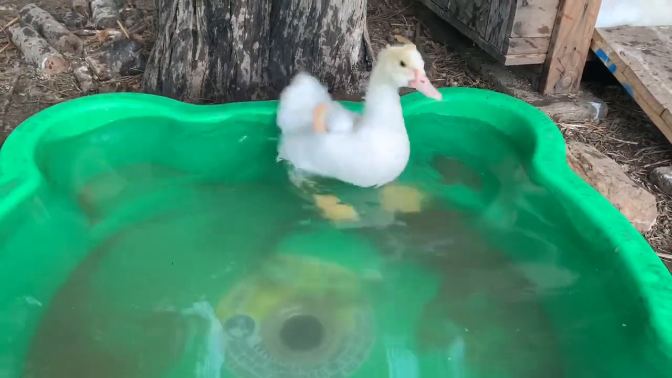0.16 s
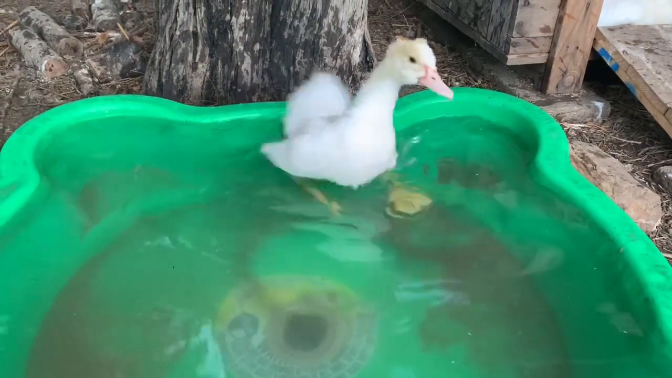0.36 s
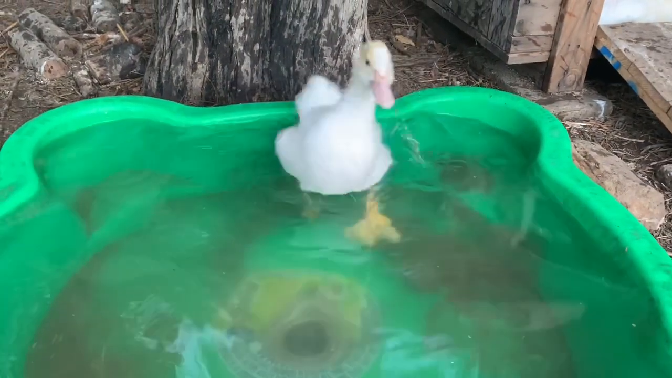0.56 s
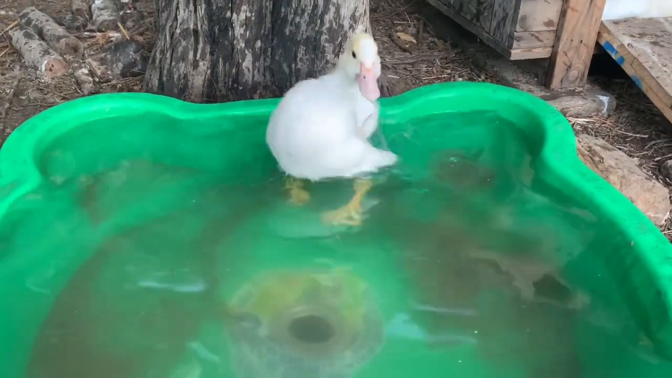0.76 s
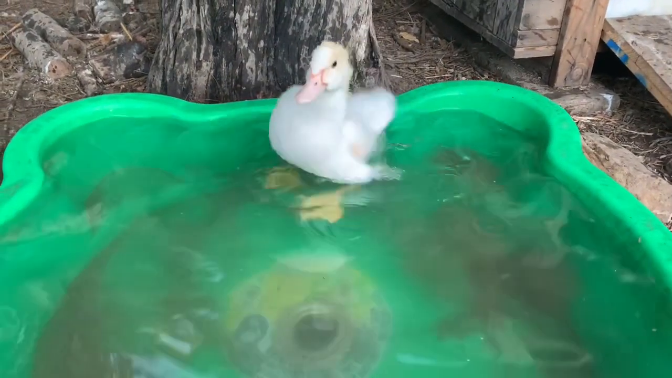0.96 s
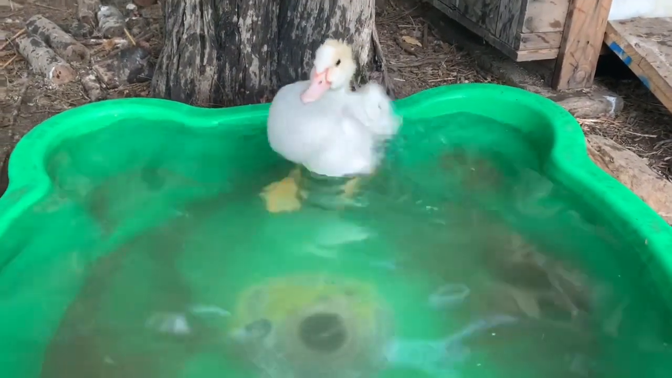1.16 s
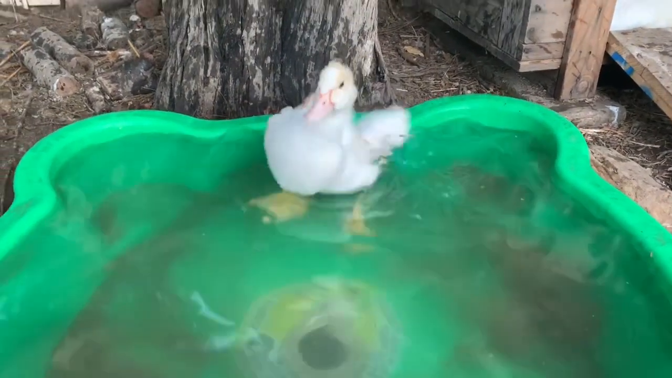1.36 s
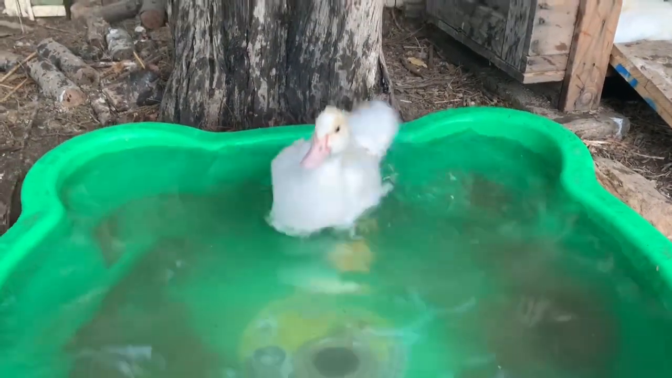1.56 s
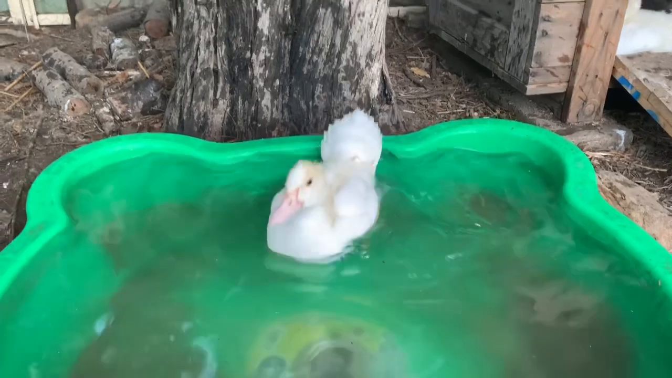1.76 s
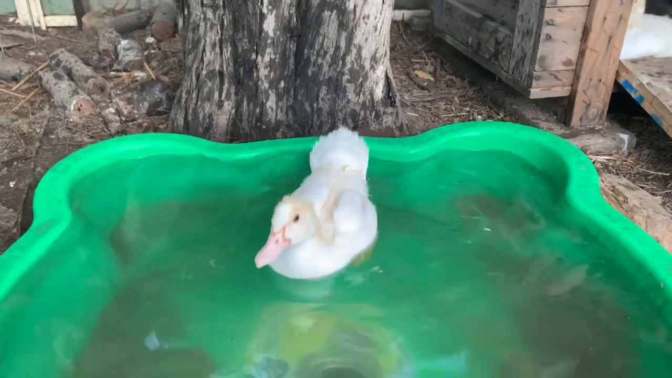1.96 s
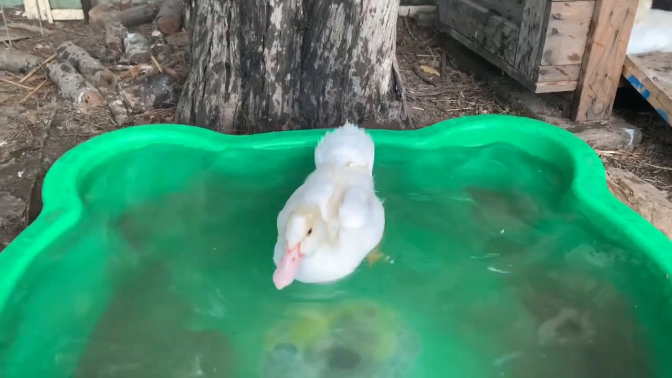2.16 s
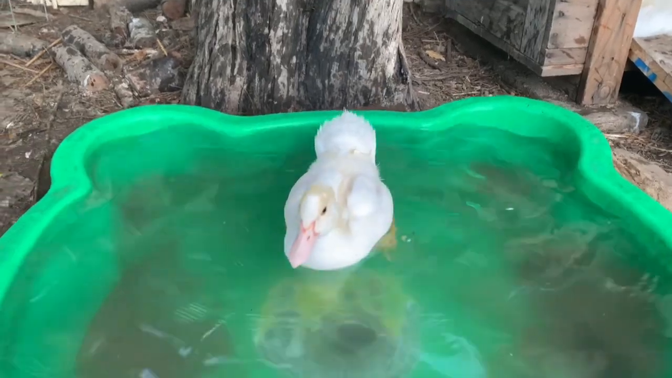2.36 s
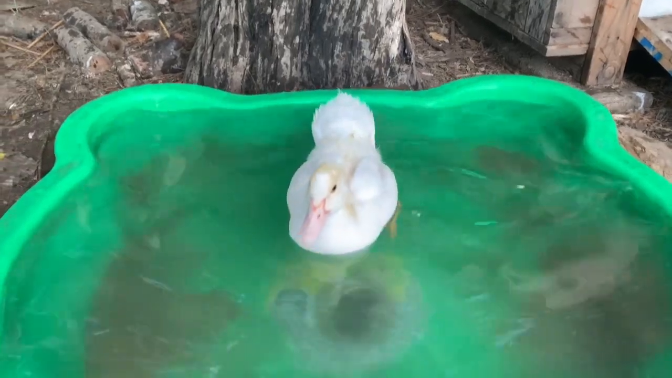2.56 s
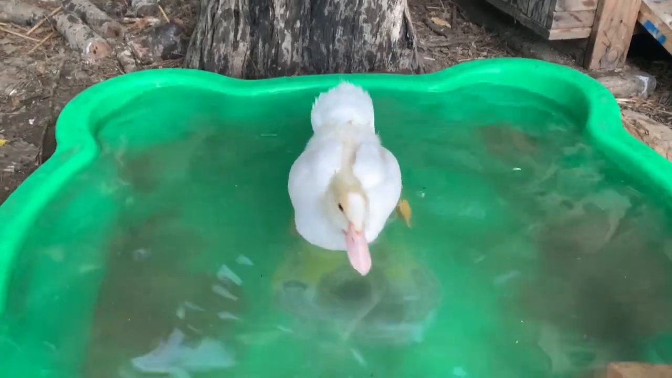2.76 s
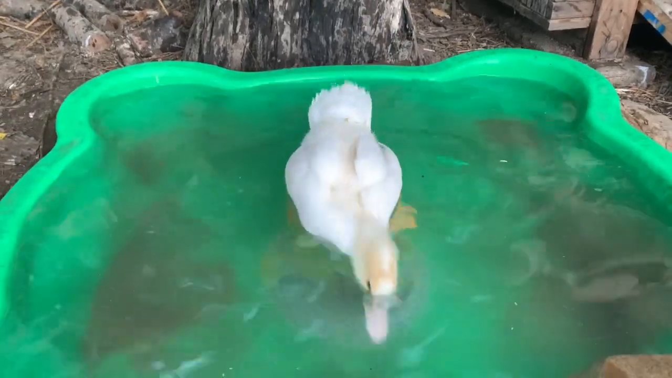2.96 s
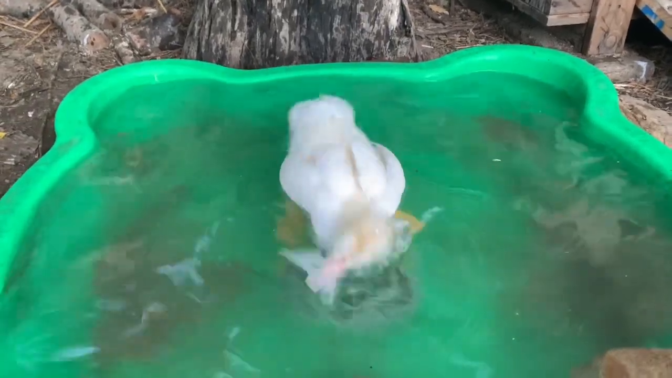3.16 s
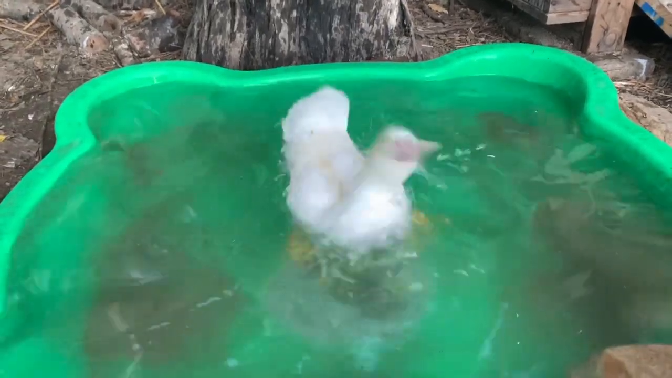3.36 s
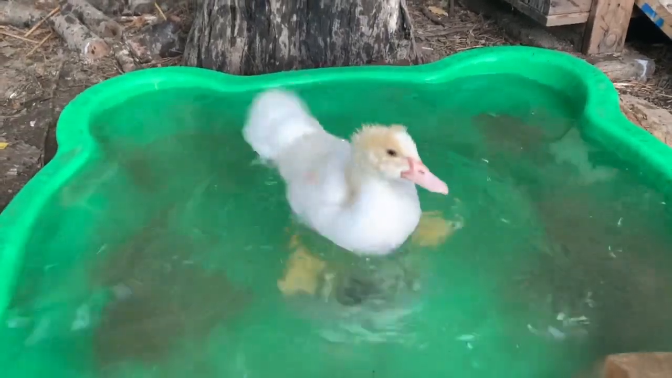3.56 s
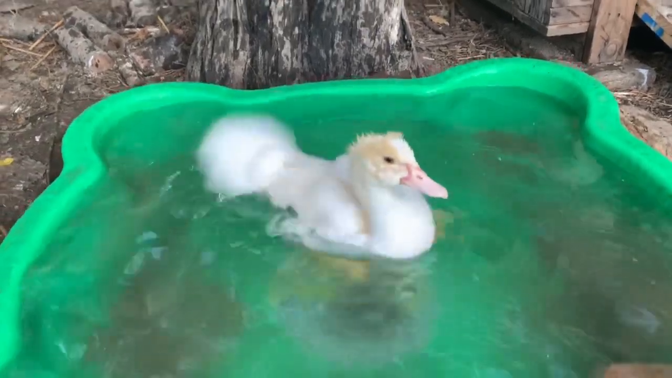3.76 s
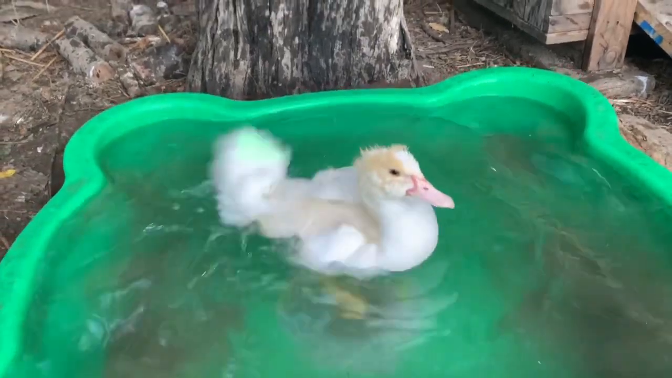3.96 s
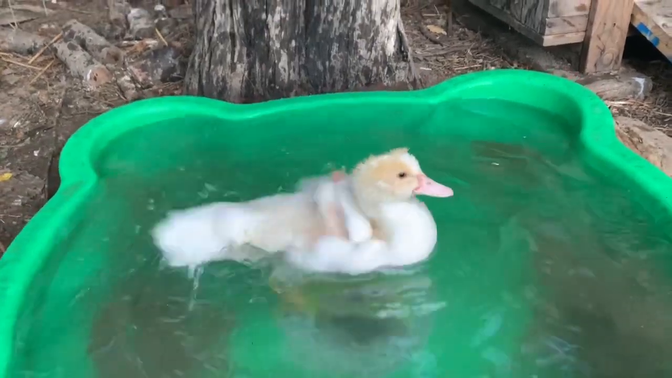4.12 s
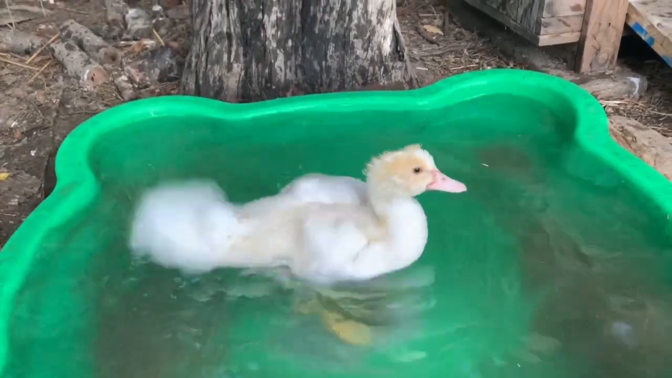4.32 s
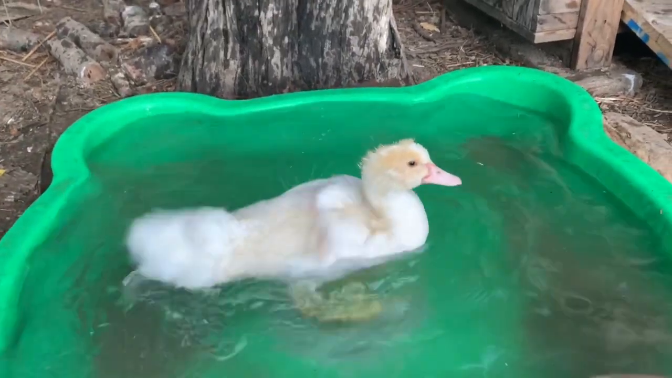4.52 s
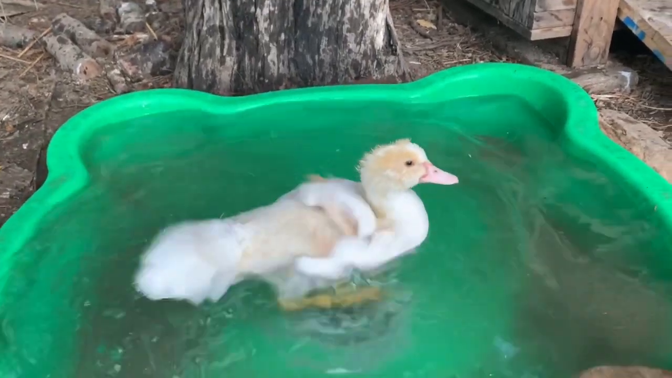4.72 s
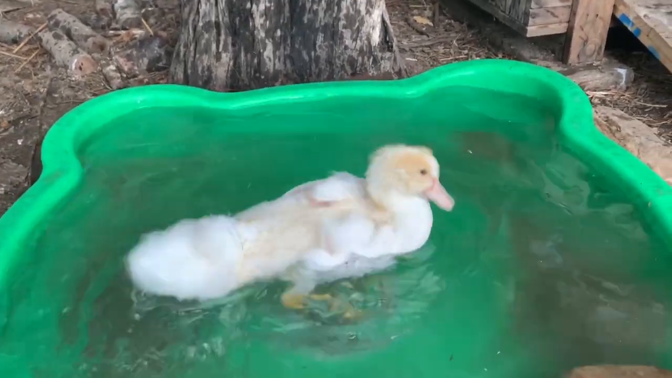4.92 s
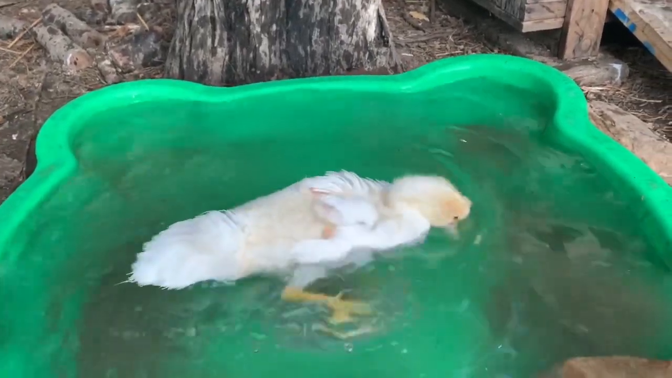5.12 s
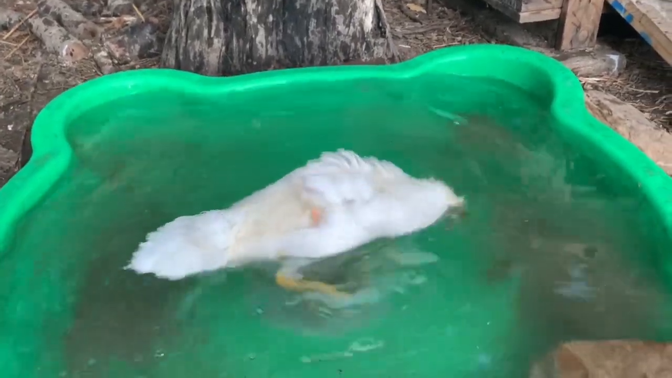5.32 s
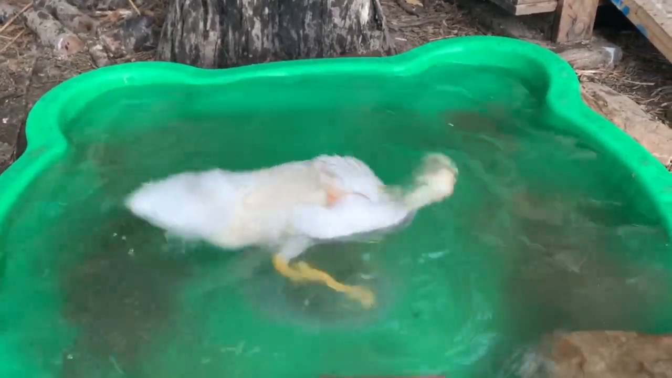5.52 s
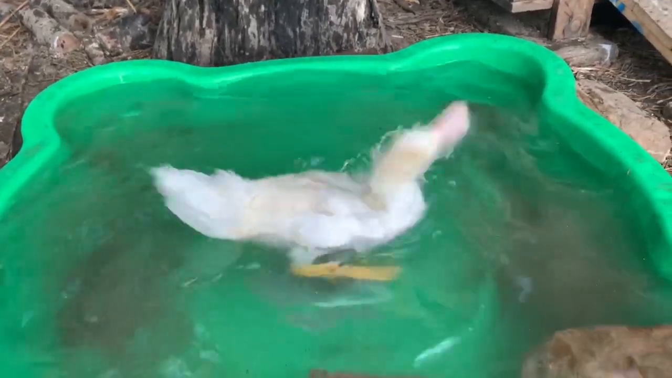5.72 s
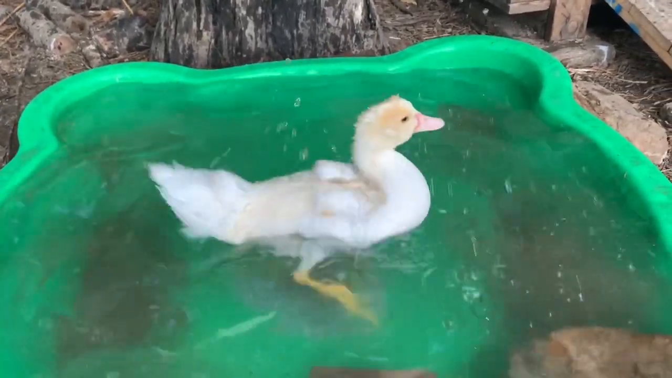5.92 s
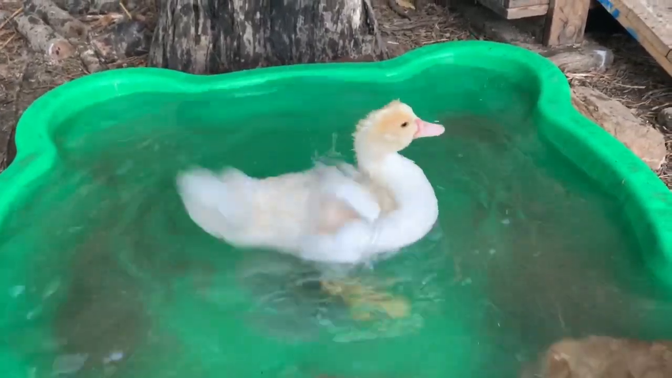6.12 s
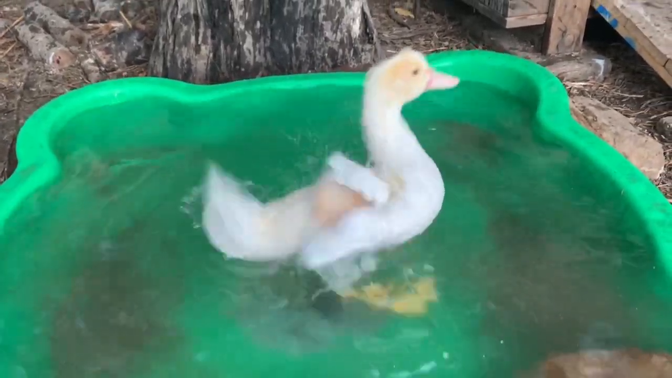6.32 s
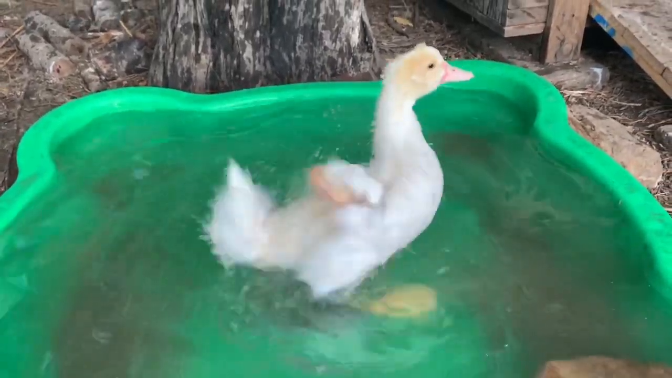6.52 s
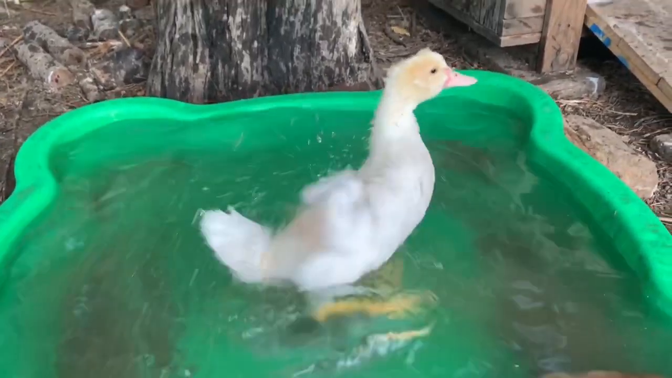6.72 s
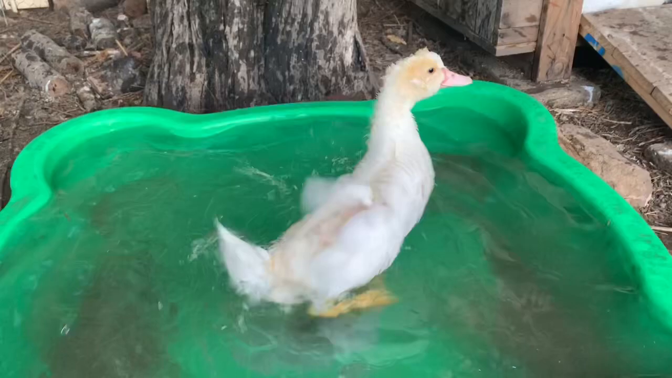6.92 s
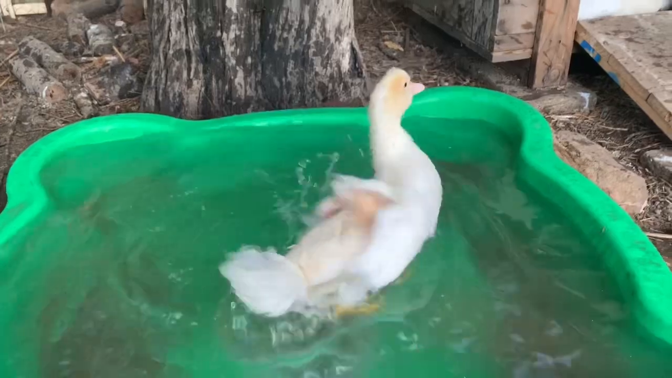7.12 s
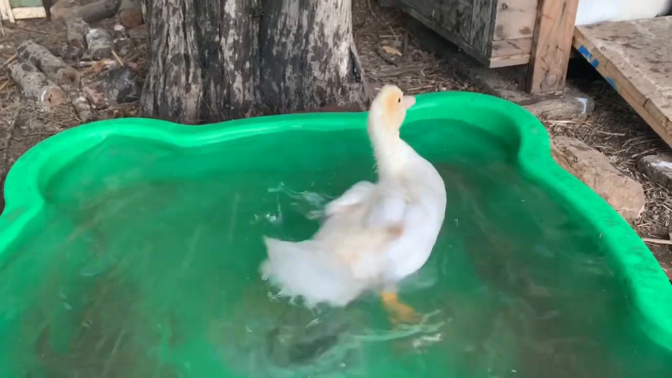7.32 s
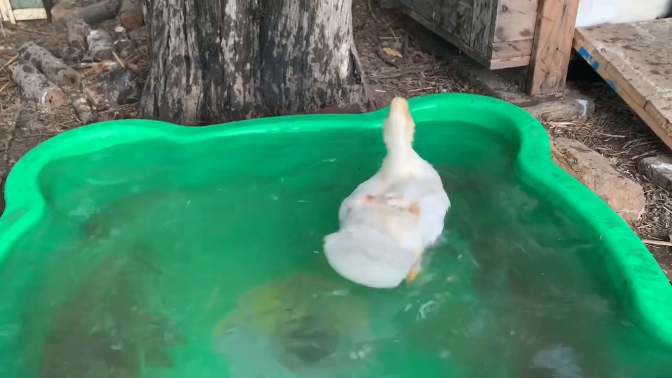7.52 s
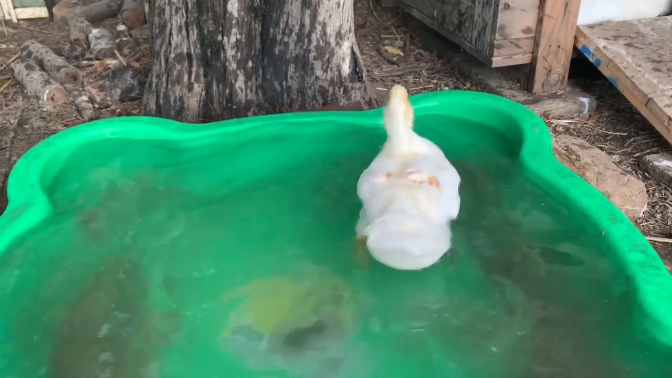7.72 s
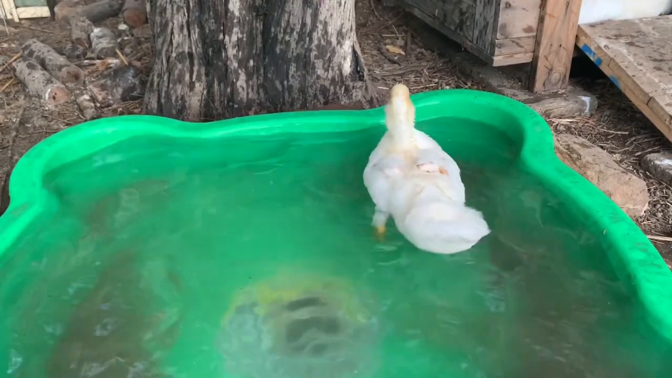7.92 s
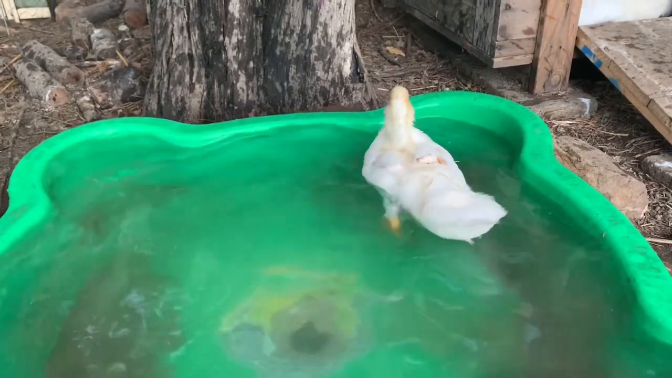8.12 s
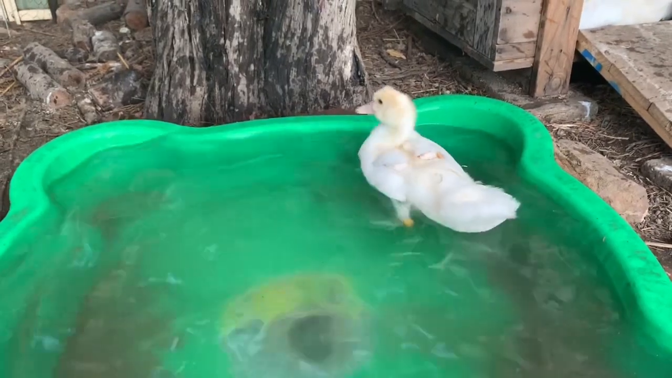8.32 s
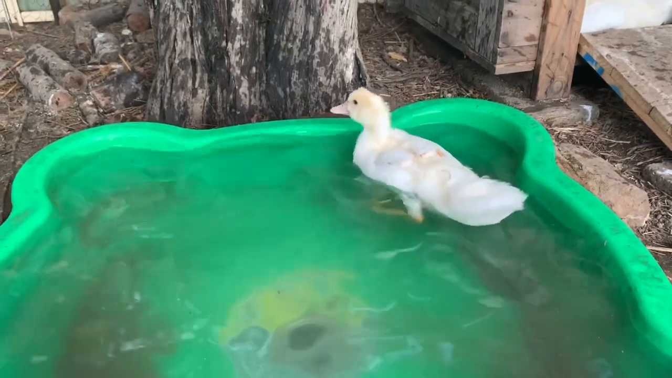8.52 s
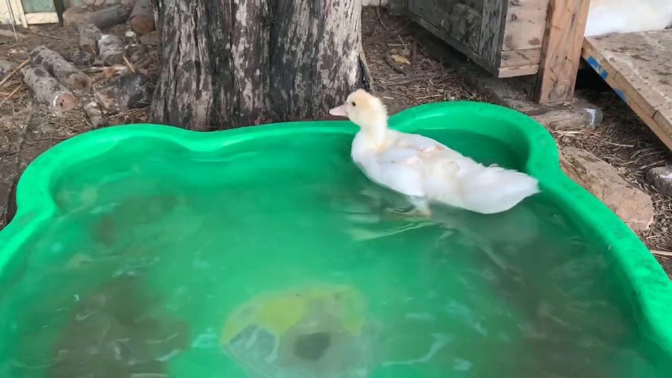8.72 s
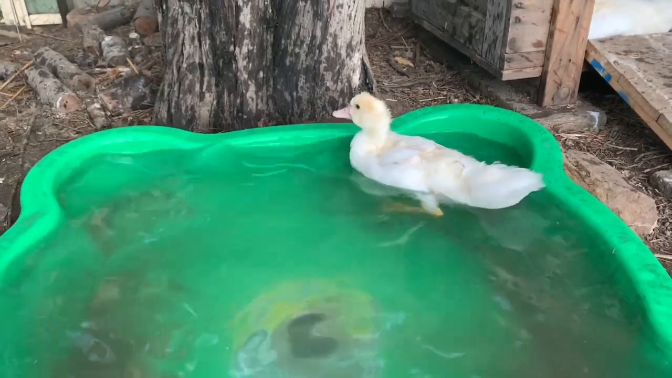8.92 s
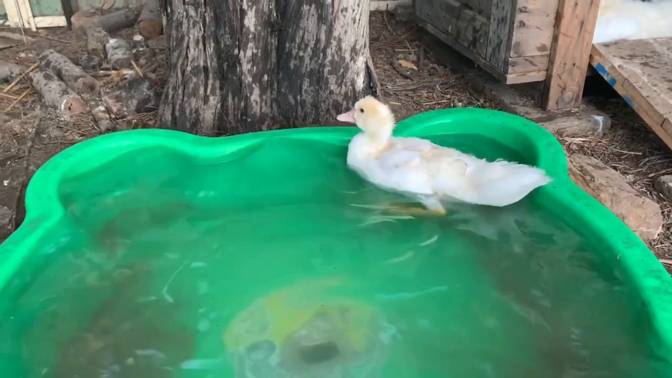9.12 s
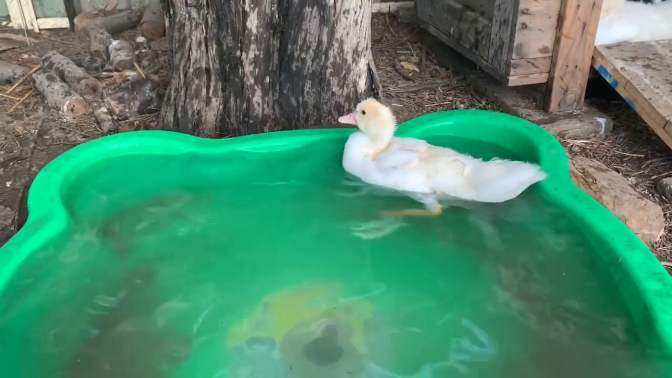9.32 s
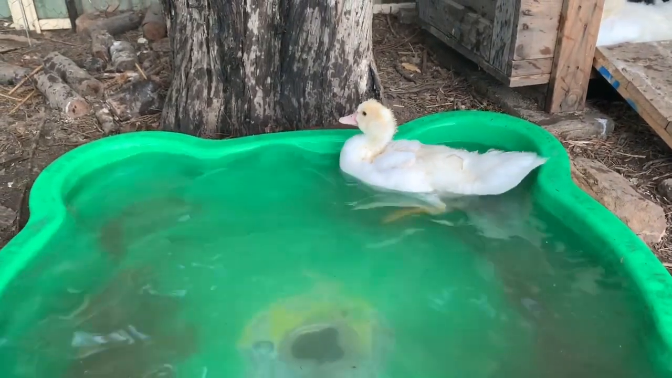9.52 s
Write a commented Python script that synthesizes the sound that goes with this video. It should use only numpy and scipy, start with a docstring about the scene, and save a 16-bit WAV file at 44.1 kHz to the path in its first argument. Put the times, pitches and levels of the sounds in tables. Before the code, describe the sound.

Close watery plips, bubbles and brief splashes from a paddling duckling, with thin high peeps over faint far engine drone, then quiet.

```python
"""Duckling in a yard pond

A duckling paddles, dips, shakes and peeps in a small plastic pond. Drops tick as short noise snaps and
trap bubbles, dying sines that mostly climb in pitch; strokes thud as low sines, plunges burst as noise.
Spray is a swarm of chirping droplets over a patchy fizz. Peeps and small birds nearby are unsteady
near-sines; a far engine of two sines rises and sinks in pitch over the noise of traffic."""
import sys
import numpy as np
from scipy import signal
from scipy.fft import rfft, irfft, next_fast_len
from scipy.io import wavfile

SR = 44100
rng = np.random.default_rng(int(sys.argv[2]) if len(sys.argv) > 2 else 0)


def int16_out(signal):
    """Quantize to a 16-bit WAV file."""
    q = np.round(np.clip(np.atleast_2d(signal).T, -1, 1) * 32767)
    wavfile.write(sys.argv[1], SR, q.astype(np.int16))


N = 426867  # length in samples

# Large trapped bubbles. Each row: start in seconds, level in dB, starting pitch in Hz,
# pitch rise in octaves per second (negative sinks), time to fall 60 dB in seconds.
BUBBLES = [(.021, -31, 1575, 4, 0.071), (0.431, -35.5, 1650, 20, 0.068), (0.563, -28.5, 1220, 42, 0.12),
           (0.762, -53, 1286, 1, 0.1), (0.995, -45.5, 1800, 7, 0.14), (.786, -51, 1960, 5, 0.049),
           (.72, -49, 2080, 2, .03), (1.373, -31.5, 2140, 10, 0.045), (1.573, -38, 2040, 7, 0.059),
           (3.117, -23, 1653, -41.5, 0.054), (3.127, -27, 1442, 4, 0.074), (3.941, -47.5, 940, 26, 0.1),
           (3.992, -29.5, 2590, 88, 0.022), (4.313, -44, 1760, 0, 0.087), (4.455, -40, 1052, 3.5, 0.11),
           (4.48, -32.5, 680, 21.5, 0.8), (4.946, -44.5, 1470, -2, 0.13), (5.646, -33, 1590, 5.5, 0.038),
           (5.742, -44, 2210, 55, 0.091), (5.779, -16, 3450, 25, 0.0099), (5.79, -28.5, 3200, -5, .03),
           (5.948, -40, 1660, 103, 0.22), (5.974, -37, 1310, -6, 0.098), (6.436, -36.5, 1345, 17.5, 0.12),
           (6.592, -24.5, 2650, 4, 0.03), (6.792, -37, 1660, 7, 0.067), (6.815, -42.5, 1590, 10.5, 0.2),
           (7.121, -25.5, 1056, 19.5, 0.063), (7.129, -32.5, 1215, -1.5, 0.12),
           (7.413, -39, 2527, 13, 0.051)]
# Drops that plip into the water. Each row: start in seconds, level in dB, starting pitch of the ring in Hz.
PLIPS = [(0.098, -38, 2150), (0.24, -35, 1280), (0.32, -39, 2750), (.677, -47, 3280), (0.9516, -40, 2270),
         (1.0177, -25, 4060), (1.47, -41, 5010), (1.7713, -40, 3820), (2.637, -51, 2300),
         (2.9067, -46, 2381), (3.1185, -24, 3360), (3.167, -29, 2850), (3.1726, -26.5, 2050),
         (3.195, -22.5, 3940), (3.222, -32.5, 2020), (3.256, -42, 1030), (3.285, -39, 980),
         (3.38, -46, 3800), (3.399, -34, 3250), (3.415, -33, 3540), (3.448, -42, 3260), (3.483, -41, 2530),
         (3.4714, -26.5, 3980), (3.8635, -30, 3700), (4.023, -33, 2450), (4.2565, -36, 3150),
         (4.3904, -31, 5760), (4.4175, -28.5, 4380), (4.428, -41, 6500), (4.466, -34, 5350),
         (4.4733, -29, 4050), (4.5116, -40, 2100), (4.66, -30.5, 4070), (5.5884, -35, 2200),
         (5.59, -42.5, 1030), (5.6067, -33, 3730), (5.6979, -44, 2510), (5.8033, -38, 2497),
         (6.019, -40, 2977), (6.076, -38, 4334), (6.8291, -34, 2310), (7.017, -34, 2900),
         (7.0556, -31, 4106), (7.2233, -39.5, 2600), (7.376, -33, 4180)]
# Drops that only tick on the water. Each row: start in seconds, level in dB.
TICKS = [(0.3507, -34.5), (0.594, -24), (0.7014, -28), (0.7405, -27.5), (0.8098, -48), (.823, -31),
         (.984, -35), (1.188, -28), (1.391, -31.5), (1.4119, -34), (1.47, -28), (1.7735, -36.5),
         (2.742, -40.5), (3.195, -19.5), (3.265, -34), (3.4202, -28.5), (3.471, -27), (3.4998, -24),
         (3.8625, -38), (3.966, -24.5), (4.2365, -28), (4.298, -33), (4.3324, -28), (4.4173, -27),
         (4.472, -37), (4.892, -27.5), (5.073, -38.5), (5.314, -46), (5.4934, -36), (5.6075, -31),
         (5.7352, -26), (5.789, -22), (6.0107, -32), (6.041, -32), (6.076, -24.5), (6.1524, -31.5),
         (6.454, -29), (6.888, -31), (6.9242, -20.5), (6.954, -21), (7.009, -28.5), (7.217, -36),
         (7.271, -37.5)]
BUBBLE_SNAP_DB, PLIP_SNAP_DB, SLOSH_DB = -2.5, -6, -18.5  # relative to the level of the ring
BUBBLE_LIFE_S = 0.052  # a bubble starts to give out here and is gone at one and a half times this
BUBBLE_ROUGH = 0.25  # rms share of tremor in its strength
SLOSH_DECAY_S = 0.011

# Wing and tail strokes. Each row: start in seconds, level in dB, starting pitch of the thud in Hz.
STROKES = [(0.522, -36.5, 366), (0.888, -30, 370), (1, -38.5, 350), (1.125, -36.5, 345),
           (1.238, -27.5, 315), (1.369, -36, 353), (1.491, -40, 328), (3.867, -37.5, 310),
           (3.915, -38, 177), (4.095, -39, 177.2), (4.14, -40, 179), (5.555, -33, 384), (5.572, -31.5, 393),
           (6.202, -36.5, 215.2), (6.425, -32.5, 296.2), (6.653, -29, 255), (6.776, -31.5, 280),
           (6.888, -27.5, 313), (7.004, -31.5, 245), (7.12, -34, 291.7), (7.524, -32, 162),
           (5.62, -41, 523), (9.014, -36, 164)]

# Plunges of the head. Each row: start in seconds, level in dB, time to fall 60 dB in seconds.
PLUNGES = [(3.115, -20.5, 0.098), (5.641, -35, 0.069)]
# Tone of a plunge. Each row: frequency in Hz, relative level in dB per Hz.
PLUNGE_SPECTRUM = [(110, -55), (180, -26.5), (1400, -11), (2260, -24), (3660, -18.5), (5250, -29),
                   (11000, -38.5), (14300, -54), (22000, -120)]

# Bouts of paddling and shaking that keep up a spray. Each row: start in seconds, stop in seconds, level in dB.
# A stop ahead of its start makes a swell that stays below the level given.
BOUTS = [(0.0, 1.555, -63.5), (3.2, 2.9, -68.5), (3.74, 4.424, -56.5), (5.58, 7.15, -63.5),
         (6.41, 6.81, -54.5)]
BUILD_DB_PER_S, SETTLE_DB_PER_S = 132, 66  # build-up ahead of a start, settling after a stop
# Surges of spray on top. Each row: peak time in seconds, level in dB, swell in dB per second,
# fall in dB per second.
SURGES = [(.02, -55, 300, 191), (0.595, -51, 232, 500), (1.52, -56, 72, 121), (2.64, -73, 900, 50),
          (3.117, -45.5, 2000, 65), (4.48, -70.5, 7.5, 204), (4.8, -58.5, 11, 33), (5.799, -49.5, 91, 402),
          (7.05, -57, 29, 600)]
# Tone of the spray. Each row: frequency in Hz, relative level in dB per Hz.
SPRAY_SPECTRUM = [(290, -3), (500, 1.5), (2290, -5.5), (3680, 2), (6090, -2), (8850, -8), (15500, -28)]
SPRAY_SNAP_DB = 30.5  # snaps among the droplets, relative to the spray tone at 6 kHz

# Duckling peeps. Each row: start in seconds, length in seconds, start pitch in Hz, end pitch in Hz,
# level of the first partial in dB, level of the second partial in dB, both at the turn of the note.
PEEPS = [(.005, 0.16, 2550, 2750, -62, -56.5), (.11, 0.093, 2920, 3050, -58.5, -55.5),
         (1.405, 0.054, 3050, 2900, -59, -67), (1.447, 0.057, 2480, 2585, -57, -54),
         (1.518, 0.1, 2870, 2790, -56.5, -62.5), (3.945, 0.147, 2866, 2970, -56.5, -61.5),
         (4.113, 0.085, 3280, 2780, -52, -56), (4.705, 0.13, 2380, 2570, -58, -52.5),
         (4.785, 0.0916, 3030, 2810, -53.5, -57), (6.672, 0.063, 2565, 3150, -57.5, -66),
         (6.722, 0.048, 2750, 3020, -53.5, -62), (6.797, 0.053, 3010, 2940, -50.5, -49)]
# One warbling peep. Each row: time in seconds, pitch in Hz, level of the first partial in dB.
WARBLE = [(3.676, 1960, -47.5), (3.707, 2830, -52.5), (3.726, 2585, -56), (3.75, 3230, -56),
          (3.768, 2380, -58), (3.79, 3120, -48), (3.801, 3130, -54), (3.812, 2830, -49), (3.828, 3100, -50),
          (3.848, 3200, -70)]
WARBLE_OVERTONE_DB = -10.5  # second partial, relative to the first
# Notes of small birds. Each row: start in seconds, length in seconds, start pitch in Hz, end pitch in Hz,
# level at the turn of the note in dB.
BIRD_NOTES = [(1.478, 0.052, 3740, 3950, -53.5), (2.65, 0.065, 3960, 4000, -75),
              (2.75, 0.1, 3230, 3280, -70), (3.952, 0.032, 4200, 4230, -54),
              (2.605, 0.027, 8380, 9360, -55), (2.635, 0.04, 9300, 8940, -61),
              (2.66, 0.3, 3030, 3150, -73.5), (2.71, 0.17, 4140, 4200, -68.5),
              (4.055, 0.027, 3640, 3850, -41), (4.085, 0.069, 4410, 4280, -48.5),
              (6.645, 0.037, 3820, 3800, -50.5), (6.745, 0.068, 4250, 4100, -48.5),
              (8.15, 0.057, 4085, 4090, -63.5), (8.27, 0.071, 4085, 4120, -67),
              (8.62, 0.078, 4080, 4090, -68), (9.525, 0.097, 4080, 4034, -70)]
# Blurred far twitter. Each row: start in seconds, length in seconds, start pitch in Hz, end pitch in Hz,
# level at the turn of the note in dB.
TWITTER = [(2.25, 0.16, 3840, 3960, -78.5), (2.28, 0.14, 4905, 4900, -79), (7.93, 0.34, 4480, 4660, -83.5),
           (8.97, 0.23, 5054, 5070, -92), (8.78, 0.12, 4050, 4000, -79.5), (9.55, 0.21, 4350, 4220, -79)]
TURN_AT, GLIDE_AT_TURN = 0.463, .7  # share of a note's length and of its glide done at its turn
PEEP_ONSET_DB, PEEP_FADE_DB = -1, -11.5  # start and end of a peep, relative to its turn
BIRD_ONSET_DB, BIRD_FADE_DB = 0.8, -5.2  # the same for birds

# Far engine. Each row: time in seconds, firing rate in Hz, first order in dB, second order in dB.
ENGINE = [(0.0, 49.25, -54, -62), (0.43, 52.46, -57, -68), (0.91, 50.9, -48, -66),
          (1.35, 39.17, -59, -50.5), (1.94, 42.93, -52, -47.5), (2.37, 35.76, -62, -45),
          (3.67, 41.43, -53, -44.5), (4.29, 51.16, -38.5, -55), (4.53, 51.73, -44, -50.5),
          (4.88, 41.56, -50.5, -44.5), (6.42, 57.25, -33.5, -57.5), (6.69, 53.53, -90, -63),
          (6.95, 59.15, -40.5, -54), (7.31, 57.3, -41, -58), (7.63, 37.08, -47, -51.5),
          (8.3, 47.37, -70, -50), (9.68, 48.7, -56, -63.5)]
# Traffic. Each row: time in seconds, rumble level in dB, tyre hiss level in dB.
TRAFFIC = [(0.0, -48, -61), (6.36, -46, -60.5), (9.68, -48, -58)]
# Tone of the rumble. Each row: frequency in Hz, relative level in dB per Hz.
RUMBLE_SPECTRUM = [(13, -64.5), (22, -24), (35, -4.5), (59, 8.5), (98, 0), (125, -7.5), (169, -14),
                   (252, -24), (400, -25), (520, -28.5), (880, -120)]
# Tone of the tyre hiss. Each row: frequency in Hz, relative level in dB per Hz.
HISS_SPECTRUM = [(120, -5), (200, -12.5), (263, -16.5), (316, -11), (360, -24), (722, -11.5), (2560, -26),
                 (3690, -36.5), (13800, -43.5), (16000, -56)]
# Width of the traffic noise. Each row: frequency in Hz, left-right likeness from -1 to 1.
LIKENESS = [(60, 0.96), (180, 0.91), (550, 0.18), (1650, -0.097), (4970, -0.23), (15000, 0.48)]

# Stereo balance of near sound. Each row: frequency in Hz, left minus right in dB.
NEAR_BALANCE = [(60, 0), (180, -2.5), (550, 2), (1650, 0.5), (4970, -3), (15000, 2)]
# Stereo phase of near sound. Each row: frequency in Hz, lead of left in radians.
PORT_PHASE = [(60, 0.0077), (430, 0.17), (1200, 1.64), (2400, 1.49), (4400, 1.95), (8500, 1.15),
              (13000, 1.7)]
CALL_LEAD_S = -0.000029  # extra lead of left for the calls; negative, so left lags
YARD_T60_S, YARD_DB = 0.074, -5
CALL_T60_S, CALL_ECHO_DB = 0.19, -2.5  # calls ring on longer among the sheds
# Microphone colour. Each row: centre in Hz, width in Hz, share of the band added (limited to -1 to 3).
PORT_TONE = [(7080, 4500, -0.53), (8900, 1490, 1), (11530, 2600, -1.2), (12330, 2900, 0.21)]
STOP_HZ = 16450  # from here up the treble is at least 70 dB down


def drops():
    """Bubbles tremble, slosh and burst; bubbles and plips start with a snap; the smallest drops only snap."""
    out = np.zeros(N)
    for s, level_db, hz, rise, t60 in BUBBLES:
        ring = bubble(hz, rise, t60)
        age_s = np.arange(len(ring)) / SR
        alive = np.clip(3 - 2 * age_s / BUBBLE_LIFE_S, 0, 1)
        tremor = 1 + BUBBLE_ROUGH * drift(214, size=len(ring))
        add(out, s, amp(level_db) * ring * alive * tremor)
        add(out, s, amp(level_db + BUBBLE_SNAP_DB) * crack(0.00041))
        add(out, s, amp(level_db + SLOSH_DB) * slosh(hz))
    for s, level_db, hz in PLIPS:
        ring = bubble(hz, 17.0, 33.0 / hz + 0.0036, attack_s=0.0003)
        add(out, s, amp(level_db) * ring)
        add(out, s, amp(level_db + SLOSH_DB) * slosh(hz))
        add(out, s, amp(level_db + PLIP_SNAP_DB) * crack(0.00059))
    for s, level_db in TICKS:
        add(out, s, amp(level_db) * crack(0.001))
    return out


def bubble(hz, rise, t60, attack_s=0.00017):
    """A dying sine whose pitch climbs (if rise is positive) as the bubble nears the surface and bursts."""
    t = np.arange(round(max(t60, .003) * SR)) / SR
    octaves = rise * t
    pitch = np.minimum(hz * 2 ** octaves, SR / 3)
    phase = 2 * np.pi * np.cumsum(pitch) / SR
    whole = np.clip((1.2 - octaves) / .25, 0, 1)  # gives out about an octave up
    return np.sin(phase) * (1 - np.exp(-t / attack_s)) * amp(-60 * t / t60) * whole


def crack(decay_s):
    """The bright snap of a drop meeting the surface, each with a band of its own."""
    t = np.arange(round(.015 * SR)) / SR
    low_hz = 4600 * 2 ** rng.uniform(-0.41, 0.51)
    high_hz = min(2.55 * low_hz, SR / 2.5)
    band = signal.butter(3, [low_hz, high_hz], "band", fs=SR, output="sos")
    noise = rms_one(signal.sosfilt(band, rng.standard_normal(len(t))))
    return noise * np.exp(-t / decay_s) * (1 - np.exp(-t / 0.00064))


def slosh(hz):
    """The water closing over a bubble: a short wash of noise around and above its starting pitch."""
    t = np.arange(round(.04 * SR)) / SR
    band = signal.butter(2, [0.8 * hz, 1.86 * hz], "band", fs=SR, output="sos")
    return rms_one(signal.sosfilt(band, rng.standard_normal(len(t)))) * np.exp(-t / SLOSH_DECAY_S)


def strokes():
    """Each stroke pushes a pocket of air and water: a few low cycles."""
    out = np.zeros(N)
    for s, level_db, hz in STROKES:
        add(out, s, amp(level_db) * bubble(hz, 3.5, 7.6 / hz, attack_s=0.0017))
    return out


def plunges():
    """The head breaks the water: a burst of shaped noise that dies within a tenth of a second."""
    out = np.zeros(N)
    for s, level_db, t60 in PLUNGES:
        t = np.arange(round(.2 * SR)) / SR
        attack = 1 - np.exp(-t / .0015)
        burst = coloured(rng.standard_normal(len(t)), PLUNGE_SPECTRUM)
        add(out, s, amp(level_db - 60 * t / t60) * attack * burst)
    return out


def churn():
    """Strength of the spray: bouts build up, hold and settle; surges add to them in power."""
    t = np.arange(N) / SR
    power = np.zeros(N)
    for start, stop, db in BOUTS:
        build_db = BUILD_DB_PER_S * np.maximum(start - t, 0)
        settle_db = SETTLE_DB_PER_S * np.maximum(t - stop, 0)
        power += amp(db - build_db - settle_db) ** 2
    for s, db, swell, fall in SURGES:
        power += amp(db - np.maximum(swell * (s - t), fall * (t - s))) ** 2
    return np.sqrt(power)


def spray(count=2400):
    """Droplets at random, in clumps, snap and chirp upward over a patchy fizz; all follow the churn."""
    level, droplets = churn(), np.zeros(N)
    snap_db = at_hz(SPRAY_SPECTRUM, 6000) + SPRAY_SNAP_DB
    for when, size, pitch, rise, wet in rng.random((count, 5)):
        s = when * N / SR
        hz = 900 * 2 ** (3.8 * pitch)
        gain = amp(-4.0 * np.log(size + .17))  # few are loud
        chirp = bubble(hz, 50 * rise ** 3, (6 + 25 * wet ** 3) / hz + .0015, attack_s=.0006)
        add(droplets, s, gain * amp(at_hz(SPRAY_SPECTRUM, hz)) * np.sqrt(hz) * chirp)
        snap_gain = gain * amp(snap_db) * (1 - wet) ** 2 / np.sqrt(size + .2)
        add(droplets, s, snap_gain * crack(.0012))
    clumps = amp(4.8 * drift(13.0))
    return level * (clumps * rms_one(droplets) + amp(-1.5) * patchy_fizz())


def patchy_fizz():
    """Fine spray: noise in bands that flicker partly together, more so in the treble, and partly alone."""
    fizz = coloured(rng.standard_normal(next_fast_len(N)), SPRAY_SPECTRUM)[:N]
    edges = np.geomspace(300, 17000, 15)
    together = np.clip(drift(28), -2, 2)
    out = np.zeros(N)
    for band in zip(edges, edges[1:]):
        sos = signal.butter(2, band, "band", fs=SR, output="sos")
        flicker_db = (1.5 + band[0] / 1900) * together + 3.0 * drift(14)
        out += signal.sosfilt(sos, fizz) * amp(flicker_db)
    return rms_one(out)


def duckling():
    """Peeps of two partials, and one long warble that leaps in pitch."""
    warble = [(*row, row[2] + WARBLE_OVERTONE_DB) for row in WARBLE]
    peeps = notes(PEEPS, PEEP_ONSET_DB, PEEP_FADE_DB)
    out = whistles(peeps, wobble=.011, flutter_db=3.0, breath_db=-9.0)
    return out + whistles([warble], wobble=.009, flutter_db=2.5, breath_db=-10.0)


def birds():
    """Clear whistled notes, and a fainter twitter blurred by strong wobble and breath."""
    clear = notes(BIRD_NOTES, BIRD_ONSET_DB, BIRD_FADE_DB)
    blurred = notes(TWITTER, BIRD_FADE_DB, BIRD_FADE_DB)
    out = whistles(clear, wobble=.003, flutter_db=2.5, breath_db=-14.0, edge_s=.015)
    return out + whistles(blurred, wobble=.022, flutter_db=2.5, breath_db=0.0, edge_s=.03)


def notes(rows, onset_db, fade_db):
    """Each note glides fast to its turn and then slower to its end: (s, Hz, dB ..) at start, turn, end."""
    calls = []
    for s, length, start_hz, end_hz, *levels in rows:
        turn_hz = start_hz + GLIDE_AT_TURN * (end_hz - start_hz)
        calls.append([(s, start_hz, *np.add(levels, onset_db)),
                      (s + TURN_AT * length, turn_hz, *levels),
                      (s + length, end_hz, *np.add(levels, fade_db))])
    return calls


def whistles(calls, wobble, flutter_db, breath_db, edge_s=.008):
    """Near-sine calls, unsteady in pitch and strength and blurred by breath; further columns are overtones."""
    out = np.zeros(N)
    for rows in calls:
        s, hz, *levels = np.transpose(rows)
        t = np.arange(s[0], s[-1], 1 / SR)
        pitch = np.interp(t, s, hz) * (1 + wobble * drift(70, size=len(t)))
        phase = 2 * np.pi * np.cumsum(pitch) / SR
        edge = np.clip(np.minimum(t - s[0], s[-1] - t) / edge_s, 0, 1)
        for k, level_db in enumerate(levels):
            gain = amp(np.interp(t, s, level_db) + flutter_db * drift(50, size=len(t)))
            breath = 1 + amp(breath_db) * drift(250, size=len(t))
            add(out, s[0], np.sqrt(2) * edge * gain * breath * np.sin((k + 1) * phase))
    return out


def engine():
    """The two lowest firing orders carry over the distance, wavering."""
    hz, first_db, second_db = in_time(ENGINE)
    phase = 2 * np.pi * np.cumsum(hz * (1 + 0.00801 * drift(4.26))) / SR
    first = amp(first_db + 1.9 * drift(22)) * np.sin(phase)
    second = amp(second_db + 2.8 * drift(13.0)) * np.sin(2 * phase)
    return np.sqrt(2) * (first + second)


def traffic():
    """A slowly swelling rumble, tyre hiss and the engine, all leaning a little to the right."""
    rumble_db, hiss_db = in_time(TRAFFIC)
    swell = amp(1.5 * drift(2))
    rumble = amp(rumble_db) * swell * far_noise(RUMBLE_SPECTRUM)
    hiss = amp(hiss_db) * far_noise(HISS_SPECTRUM)
    return (rumble + hiss + engine()) * amp([[-.6], [.6]])


def far_noise(spectrum):
    """Stereo noise mixed from mid and side: nearly alike in the bass, far less so above."""
    size = next_fast_len(N)
    alike = np.clip(at_hz(LIKENESS, np.fft.rfftfreq(size, 1 / SR) + 1), -1, 1)
    mid, side = rfft(rng.standard_normal((2, size)))
    both = irfft(np.sqrt(1 + alike) * mid + np.sqrt(1 - alike) * side * [[1], [-1]], size)
    return coloured(both, spectrum)[:, :N]


def ports(x, lead_s):
    """Near sound reaches the two microphone ports with unlike strength and phase."""
    size = next_fast_len(N + 4096)
    hz = np.fft.rfftfreq(size, 1 / SR) + 1
    strength = amp(at_hz(NEAR_BALANCE, hz) / 2)
    turn = np.exp(.5j * at_hz(PORT_PHASE, hz) + 1j * np.pi * hz * lead_s)
    tilt = strength * turn  # half to the left, its inverse to the right
    return irfft(rfft(x, size) * np.array([tilt, 1 / tilt]), size)[:, :N]


def yard(x, t60, level_db):
    """Pond wall, trunk and shed scatter a thin tail of decaying noise, unlike in each port."""
    t = np.arange(round(.4 * SR)) / SR
    noise = signal.lfilter([1, -.8], [1, -.3], rng.standard_normal((2, len(t))))
    tail = noise * amp(-60 * t / t60) * (t > .002)
    tail = tail / np.sqrt(np.sum(tail ** 2, axis=1, keepdims=True))
    return amp(level_db) * signal.fftconvolve(x[None], tail, axes=1)[:, :N]


def amp(db):
    """dB to gain."""
    return 10 ** (np.asarray(db) / 20)


def rms_one(x):
    """Scale to rms 1."""
    return x / np.sqrt(np.mean(x ** 2) + 1e-20)


def in_time(rows):
    """Each column of a curve at every sample."""
    s, *columns = np.transpose(rows)
    return [np.interp(np.arange(N) / SR, s, c) for c in columns]


def at_hz(points, hz):
    """Read a spectrum on a log-frequency axis."""
    point_hz, values = np.array(points).T
    return np.interp(np.log(hz), np.log(point_hz), values)


def drift(rate, size=N):
    """Smooth random wander of rms about 1, faster for a higher rate in Hz."""
    step = 40  # samples between the points drawn
    r = np.exp(-2 * np.pi * rate * step / SR)
    noise = rng.standard_normal(size // step + 2002)
    slow = signal.lfilter([1], [1, -2 * r, r * r], noise)[2000:]  # skip the run-in
    return np.interp(np.arange(size) / step, np.arange(len(slow)), rms_one(slow))


def add(out, s, sound):
    """Mix a sound in at time s."""
    i = round(s * SR)
    out[i:i + len(sound)] += sound[:N - i]


def coloured(x, spectrum):
    """Shape a signal by a spectrum; rms 1."""
    hz = np.fft.rfftfreq(x.shape[-1], 1 / SR) + 1
    return rms_one(irfft(rfft(x) * amp(at_hz(spectrum, hz)), x.shape[-1]))


def scene():
    """Pond close by, birds around, traffic far away."""
    pond = drops() + strokes() + spray() + plunges()
    calls = duckling() + birds()
    near = ports(pond, 0) + ports(calls, CALL_LEAD_S)
    echoes = yard(pond, YARD_T60_S, YARD_DB) + yard(calls, CALL_T60_S, CALL_ECHO_DB)
    return near + echoes + traffic()


def record(dry):
    """The housing drops the deepest bass and colours the treble with peaks and dips; the top is cut."""
    out = signal.sosfilt(signal.butter(2, 36, "high", fs=SR, output="sos"), dry)
    for hz, width_hz, share in PORT_TONE:
        band = signal.lfilter(*signal.iirpeak(hz, hz / width_hz, SR), out)
        out = out + np.clip(share, -1, 3) * band
    return signal.sosfilt(signal.cheby2(14, 70, STOP_HZ, fs=SR, output="sos"), out)


dry = scene()
out = record(dry)
int16_out(out)
```